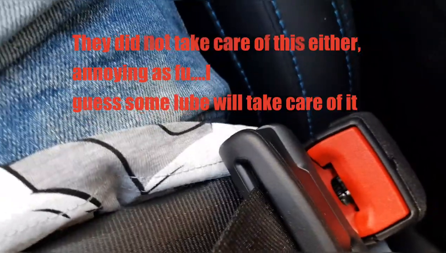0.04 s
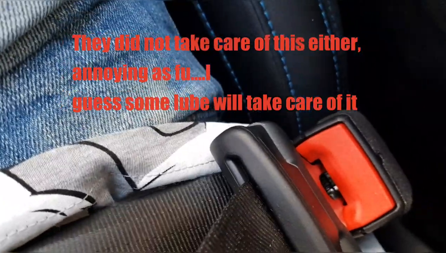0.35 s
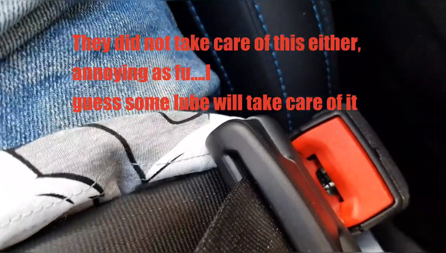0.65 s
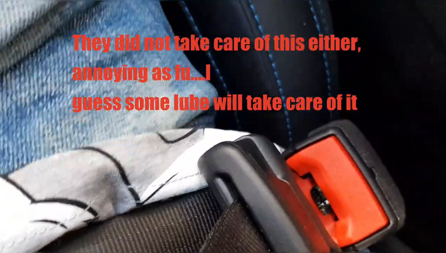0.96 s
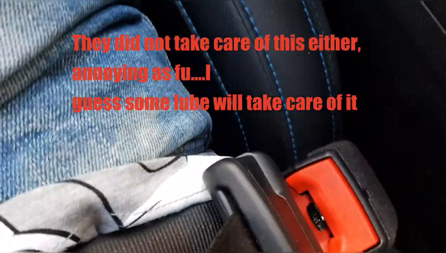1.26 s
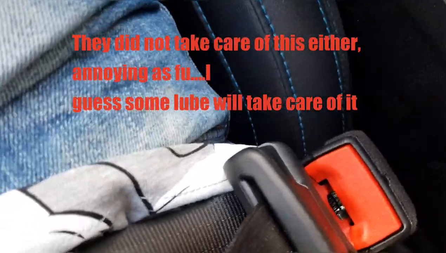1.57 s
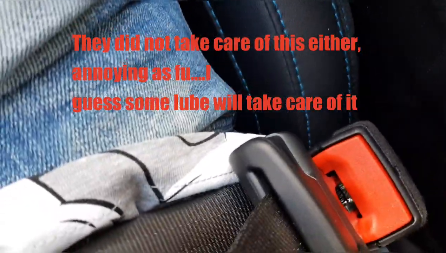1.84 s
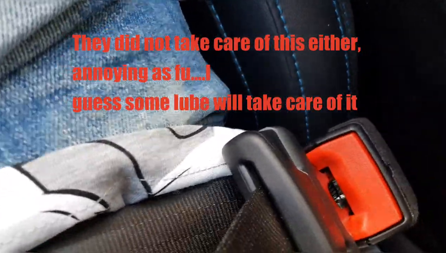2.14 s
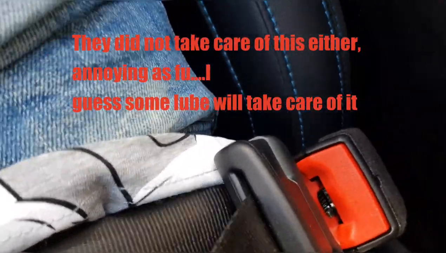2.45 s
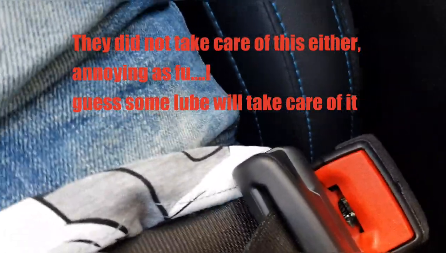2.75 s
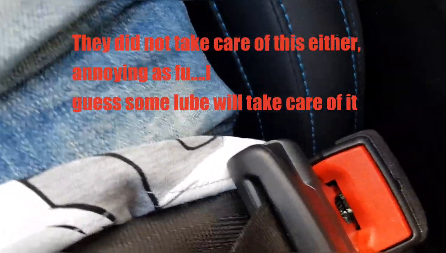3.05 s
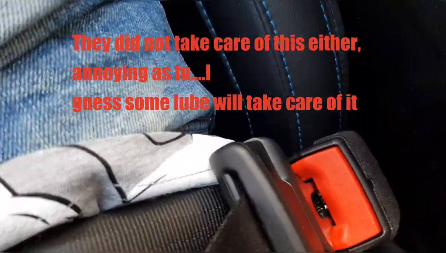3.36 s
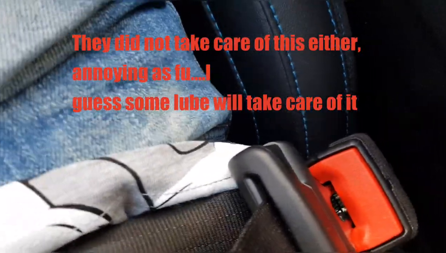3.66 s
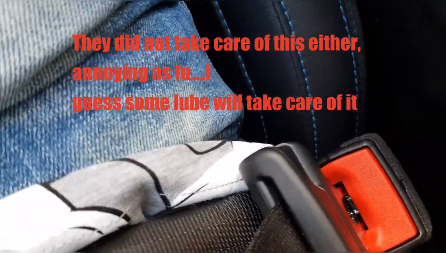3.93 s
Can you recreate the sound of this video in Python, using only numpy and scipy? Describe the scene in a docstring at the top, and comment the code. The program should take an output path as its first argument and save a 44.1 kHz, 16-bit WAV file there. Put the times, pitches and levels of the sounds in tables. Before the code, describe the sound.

A seat belt buckle clicks and creaks dryly over the low rumble of a moving car.

```python
"""Inside a moving car, a dry seat belt buckle creaks close by.
Its latch sticks and slips, often in runs of two or three clicks: each slip cracks, rings the
plastic shell and thumps the stalk that holds the buckle. The belt and clothes rub softly as the
load shifts. Road rumble and the throb of an uneven tyre fill the small cabin."""
import sys
import numpy as np
from scipy import signal
from scipy.fft import rfft, irfft
from scipy.io import wavfile
from scipy.ndimage import uniform_filter1d, map_coordinates

SR = 44100
rng = np.random.default_rng(int(sys.argv[2]) if len(sys.argv) > 2 else 0)


def wav_record(signal):
    """Record a signal, one row per channel, as 16-bit PCM in the file named by sys.argv[1]."""
    frames = np.transpose(np.atleast_2d(signal))
    bounded = np.clip(frames, -1, 1)
    # unit amplitude maps onto the largest positive 16-bit level
    quanta = np.round(bounded * 32767).astype(np.int16)
    wavfile.write(sys.argv[1], SR, quanta)


N = 176400  # 4 seconds

# slips of the latch; buckle() shifts each of the three levels by a set amount
# (time [s], thump [dB], shell ring [dB], crack [dB], knock pitch [Hz], hardness [dB per octave])
SLIPS = [(0.1484, -40.5, -38, -65, 1250, -6), (0.199, -40.5, -41.5, -81, 1240, -17),
         (0.478, -35.5, -33, -53.5, 1270, 2), (0.996, -41.5, -43, -77, 1307, -4),
         (1.0187, -40.5, -36, -60, 1400, -3), (1.0584, -37, -34.5, -58, 1280, 3),
         (1.1679, -38, -36, -49, 1440, -4), (1.2332, -36, -32.5, -41, 1460, 0),
         (1.4836, -36.5, -43, -47.5, 1390, 0), (1.571, -35, -34.5, -51.5, 1310, 1),
         (1.725, -35.5, -37, -52.5, 1330, 1), (2.2893, -36.5, -37.5, -54.5, 1374, -1),
         (2.3299, -32.5, -32, -46.5, 1400, 1), (2.3675, -30.5, -29, -44.5, 1274, 6),
         (2.7205, -32, -35, -44.5, 1370, -1), (2.7584, -37.5, -36, -57, 1420, 4.5),
         (3.2533, -31.5, -32.5, -46, 1410, 0), (3.3015, -29.5, -29, -43.5, 1200, 3),
         (3.3466, -29.5, -27, -42, 1260, 3.5), (3.721, -34, -31.5, -49, 1290, 3),
         (3.7645, -36, -33, -51.5, 1280, 4)]
def buckle():
    """Each slip snaps the latch, rings the shell twice as it bounces, and thumps the stalk."""
    out = np.zeros((2, N))
    bounce_s, thump_lag_s = .0041, .00094
    for start, thump_db, shell_db, crack_db, knock_hz, hardness in SLIPS:
        bounce = bounce_s * (1 + .211 * rng.standard_normal())
        add(out, start, hit_level(crack(ring_s=.015), crack_db - 2.8))
        add(out, start, hit_level(latch(), crack_db - 13))
        add(out, start, hit_level(shell(knock_hz, hardness), shell_db - 7))
        add(out, start + bounce, hit_level(shell(knock_hz, hardness), shell_db - 18.5))
        add(out, start + thump_lag_s, delay_right(hit_level(stalk(), thump_db + 1.5)))
    return out


# tone of the crack (pitch [Hz], level [dB])
CRACK_TONE = [(500, -31), (1200, 16.5), (3000, 3.5), (4200, 4), (6000, 6), (8000, 2.5), (11000, -1.5),
              (16000, -13)]
def crack(ring_s):
    """Dry surfaces let go with a short, noisy snap."""
    swell = fade(ring_s) - fade(.0013)  # the quick second fade softens the start
    return colour(rng.standard_normal((2, len(swell))) * swell, CRACK_TONE)


# notes of the latch (pitch [Hz], ring time [s], left [dB], right [dB])
LATCH_NOTES = [(3870, 0.018, 1, -18), (4613, 0.027, -14, 3), (4800, 0.021, -14, -5), (5830, 0.014, 7, 6),
               (6940, 0.013, -1, -10), (7950, 0.015, -11, 9)]
def latch():
    """The snapping latch rings briefly and brightly."""
    return strike(LATCH_NOTES)


# notes of the plastic shell (pitch [Hz], ring time [s], left [dB], right [dB])
SHELL_NOTES = [(1035, 0.021, -3, -12), (1200, 0.028, 1, -7), (1345, 0.044, -2, -16),
               (1520, 0.018, 4.5, -21), (1672, 0.022, -5.5, -15), (1810, 0.039, -14, -7.5),
               (2390, 0.024, 1.5, -5.5), (2530, 0.0098, -3.5, -27)]
def shell(knock_hz, hardness):
    """A blow on the shell makes a hollow clack; a harder one favours the notes above 1400 Hz."""
    knock = (knock_hz, .023, 10.5, 0)  # this note depends on where the latch catches
    notes = [(hz, ring_s, *(np.array(levels) + hardness * np.log2(hz / 1400)))
             for hz, ring_s, *levels in [*SHELL_NOTES, knock]]
    return passband(passband(strike(notes), 2690, "low"), 928, "high")


# notes of the stalk and the side of the seat (pitch [Hz], ring time [s], level [dB])
STALK_NOTES = [(250.3, 0.29, -9.5), (321, 0.034, 8), (464, 0.023, 4.5), (563.6, 0.022, 7.5),
               (708, 0.029, -1)]
def stalk():
    """The jolt travels down the stalk as a low thump."""
    return passband(strike(STALK_NOTES), 733, "low")


# light touches on the belt's steel tongue (time [s], level [dB])
TOUCHES = [(1.4864, -43), (1.4954, -39), (2.1, -69), (2.891, -56), (3.917, -59.5)]
# notes of the tongue (pitch [Hz], ring time [s], left [dB], right [dB])
TONGUE_NOTES = [(1187, 0.019, -7, -12), (1320, 0.034, 1, -8.5)]
def tongue():
    """A light touch rings only the steel tongue, with no treble."""
    out = np.zeros((2, N))
    for start, db in TOUCHES:
        add(out, start, hit_level(passband(strike(TONGUE_NOTES), 1870, "low"), db))
    return out


# ticks of the trim (time [s], level [dB])
TRIM_TICKS = [(0.716, -65), (1.263, -62), (1.347, -71), (1.578, -62), (2.705, -63), (2.731, -61),
              (3.734, -59)]
def trim():
    """The trim gives faint, dry ticks: short cracks thinned of their bass."""
    out = np.zeros((2, N))
    for start, db in TRIM_TICKS:
        add(out, start, hit_level(np.diff(crack(ring_s=.0099)), db))
    return out


# tone of the cabin's echo (pitch [Hz], level [dB])
ECHO_TONE = [(100, -13.5), (300, -14.5), (900, -4.5), (1500, -2.5), (2400, 4.5), (4000, 3), (8000, -0.5),
             (16000, -28)]
def cabin(sound):
    """Sound bounces off seats, console and glass; the padding soaks up the treble first."""
    onset = fade(.0044)
    noise = rng.standard_normal((2, len(onset)))
    tail = 0
    for band, ring_s in (("low", .13), ("high", .055)):
        swell = fade(ring_s) - onset
        tail = tail + passband(noise, 1000, band) * swell / np.sqrt(np.sum(swell ** 2))
    echo = signal.fftconvolve(sound, colour(tail, ECHO_TONE), axes=1)[:, :N]
    return sound + undb(-7.5) * echo


# rubs of the belt (peak time [s], rise [s], fall [s], level [dB])
BELT_RUBS = [(1.21, 0.11, 0.12, -55), (1.565, 0.068, 0.091, -58)]
# tone of those rubs (pitch [Hz], level [dB])
BELT_TONE = [(400, 11.5), (1000, 3), (1600, 2), (2500, 0), (4000, -2), (7500, -1.5), (9500, -3),
             (12000, 2.5), (16000, -8)]
def belt():
    """The woven belt rubs as the load shifts."""
    return rubbing(BELT_RUBS, BELT_TONE, flicker_db=2.2)


# rubs of clothing, then lighter, silky slides of a hand over the fabric (peak time [s], rise [s], fall [s],
# level [dB])
CLOTH_RUBS = [(.19, 0.061, 0.11, -62.5), (.42, 0.077, 0.095, -57), (.84, 0.22, 0.18, -60.5),
              (1.11, 0.076, 0.14, -57.5), (2.34, 0.074, 0.095, -56.5), (2.78, 0.055, 0.093, -56.5),
              (3.39, .17, 0.11, -56.5), (3.8, 0.088, 0.097, -59.5)]
HAND_SLIDES = [(.7, .2, 0.31, -72.5), (2.14, .04, 0.12, -70.5), (2.65, .04, 0.087, -67),
               (3.12, 0.082, 0.13, -73.5), (3.95, 0.036, 0.15, -71.5)]
# tone of each (pitch [Hz], level [dB])
RUB_TONE = [(500, 18), (1400, 5), (2500, 4.5), (3500, -2), (6000, 1), (8000, 0.5), (10000, -2),
            (13000, -1.5), (16000, -12)]
SLIDE_TONE = [(2000, -9), (5000, -6.5), (7000, -1.5), (9000, -1), (11500, -4.5), (16000, -11)]
def clothes():
    """Clothes rub as the belt takes up the load, and a hand slides lightly over the fabric."""
    rubs = rubbing(CLOTH_RUBS, RUB_TONE, flicker_db=1.2)
    slides = rubbing(HAND_SLIDES, SLIDE_TONE, flicker_db=1.2)
    return pan(-3) * (rubs + slides)


def rubbing(rubs, tone, flicker_db):
    """Fibres catch and let go in a grainy hiss that swells with each movement."""
    t = np.arange(N) / SR
    power = sum(undb(db) ** 2 * np.exp(-((t - peak) / np.where(t < peak, rise, fall)) ** 2)
                for peak, rise, fall, db in rubs)
    noise = rng.standard_normal((2, N))
    grain_db = 2 * wander(rate_hz=3000) + flicker_db * wander(rate_hz=30)
    return level(colour(noise * undb(grain_db), tone), 0) * np.sqrt(power)


# tone of the road rumble (pitch [Hz], level [dB])
ROAD_TONE = [(20, 6.5), (36, -11.5), (52, 5.5), (68, -2), (100, -4), (140, 2.5), (165, 2), (200, -5),
             (255, 0.5), (300, -9.5), (380, -12), (470, -19), (600, -24), (790, -21), (950, -28.5),
             (1150, -44), (2000, -54.5), (3500, -57.5)]
def road():
    """Rolling over the road makes a deep rumble, nearly the same on both sides."""
    middle, side = colour(rng.standard_normal((2, N)), ROAD_TONE)
    rumble = middle + undb(-12.5) * side * np.array([[1], [-1]])
    return pan(-1) * level(rumble, -39.5)


# uneven spots on the tyre (time into the turn [s], pitch [Hz], length [s], base level [dB])
TYRE_BUMPS = [(.037, 123, 0.017, -37), (.059, 122, 0.0087, -35), (.114, 125, 0.022, -33),
              (.165, 127, 0.013, -29.5)]
# how the throb grows and eases along the road (time [s], level change [dB])
THROB = [(0, 0), (.45, -1), (.8, 1.5), (1.3, 1), (1.75, 1), (2.15, -2), (2.8, 2.5), (3.3, 0.5), (4, -3)]
def tyre():
    """The same soft bumps come round with every turn of the wheel and make the cabin boom."""
    turn_s, jitter_s, scatter_db = .197, .00083, 1.5
    out = np.zeros((2, N + SR // 2))
    t = np.arange(-2048, 2048) / SR
    for turn in np.arange(0, N / SR, turn_s):
        for offset, hz, length, db in TYRE_BUMPS:
            late, size = rng.standard_normal(2)
            boom = np.exp(-(t / length) ** 2) * np.cos(2 * np.pi * hz * t)
            add(out, turn + offset + jitter_s * late, undb(db + scatter_db * size) * boom)
    booms = out[:, len(t) // 2:][:, :N]  # centre each boom on its time
    throb = undb(np.interp(np.arange(N) / SR, *np.array(THROB).T))
    return pan(-4) * throb * booms


# hums of the parts that drive the wheels (pitch [Hz], width [Hz], level [dB])
DRONES = [(42, 3.3, -52), (81, 2.3, -50.5), (120.7, 3.8, -43.5), (471, 3.6, -61.5)]
def drive_train():
    """The drive train hums in a few low, wavering notes."""
    return pan(-2.5) * sum(undb(db) * narrow_noise(hz, width) for hz, width, db in DRONES)


# tone of the air's hiss (pitch [Hz], level [dB])
AIR_TONE = [(700, 7.5), (1400, 5.5), (2000, 2), (3500, -2), (7000, -3), (11000, -2.5), (15000, -3)]
def air():
    """Air hisses thinly, with a faint breathy note from a vent on the left."""
    hiss = level(colour(rng.standard_normal((2, N)), AIR_TONE), -70.5)
    vent = undb(-81) * pan(26) * narrow_noise(1337, width_hz=250)
    return hiss + vent


def strike(notes):
    """A struck object rings with all its notes, a little different at each blow."""
    detune, scatter_db = .011, 3
    out = 0
    for hz, ring_s, *levels in notes:
        sharp, loud = rng.standard_normal(2)
        decay = fade(ring_s)
        wave = np.sin(2 * np.pi * hz * (1 + detune * sharp) * np.arange(len(decay)) / SR)
        out = out + undb(np.array(levels)[:, None] + scatter_db * loud) * decay * wave
    return out


def fade(ring_s):
    """Die away by 60 dB over the ring time."""
    return np.exp(-np.log(1000) * np.arange(8192) / SR / ring_s)


def narrow_noise(hz, width_hz):
    """Noise gathered around one pitch."""
    freqs = np.fft.rfftfreq(N, 1 / SR)
    spectrum = rfft(rng.standard_normal(N)) / (1 + ((freqs - hz) / width_hz) ** 2)
    return level(irfft(spectrum, N), 0)


def wander(rate_hz):
    """A smooth random curve with a typical size of 1."""
    step = int(SR / rate_hz)
    stairs = np.repeat(rng.standard_normal(N // step + 1), step)
    return level(uniform_filter1d(stairs, step)[:N], 0)


def colour(x, tone):
    """Shape a sound's bass and treble to follow a tone table."""
    n = x.shape[-1]
    hz, db = np.array(tone, float).T
    gain = undb(np.interp(np.log(np.fft.rfftfreq(n, 1 / SR) + 1), np.log(hz), db))
    # fold the filter forward in time, so nothing rings before the sound starts
    cepstrum = irfft(np.log(gain), n)
    cepstrum[1:n // 2] *= 2
    cepstrum[n // 2 + 1:] = 0
    return irfft(rfft(x) * np.exp(rfft(cepstrum)), n)


def passband(x, hz, band):
    """Keep the "low" or "high" side of a pitch."""
    return signal.sosfilt(signal.butter(4, hz, band, fs=SR, output="sos"), x)


def undb(db):
    """Turn decibels into a multiplier."""
    return 10 ** (np.asarray(db) / 20)


def level(x, db):
    """Set the average (rms) level."""
    return x * undb(db) / np.sqrt(np.mean(x ** 2))


def hit_level(x, db):
    """Set a blow's level as if its energy were spread over a hundredth of a second."""
    return x * undb(db) / np.sqrt(np.mean(np.sum(x ** 2, axis=-1)) / (SR / 100))


def pan(db):
    """Make the left side louder than the right by db."""
    return undb(np.array([[db], [-db]]) / 2)


def delay_right(x, lag_s=.00011):
    """Low sound reaches the right side a moment after the left."""
    earlier = np.arange(x.shape[-1]) - lag_s * SR
    return np.array([x[0], map_coordinates(x[-1], [earlier], order=1, mode="nearest")])


def add(out, start_s, x):
    """Mix a short sound in at its start time."""
    i = max(int(start_s * SR), 0)
    out[:, i:i + x.shape[-1]] += x[..., :max(out.shape[-1] - i, 0)]


def scene():
    """Buckle and fabric inside the moving car."""
    fabric = belt() + clothes()
    car = delay_right(road() + tyre() + drive_train()) + air()
    return cabin(buckle() + tongue() + trim()) + fabric + car


def record(dry):
    """Cut the very highest treble, above 15800 Hz."""
    return signal.sosfilt(signal.ellip(8, .2, 70, 15800, fs=SR, output="sos"), dry)


dry = scene()
out = record(dry)
wav_record(out)
```